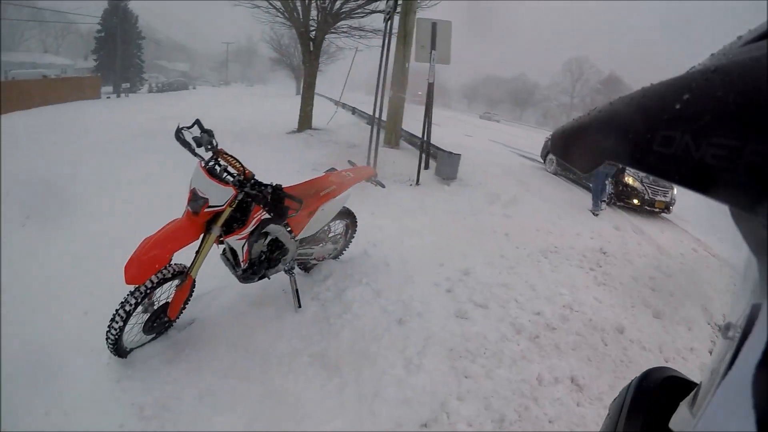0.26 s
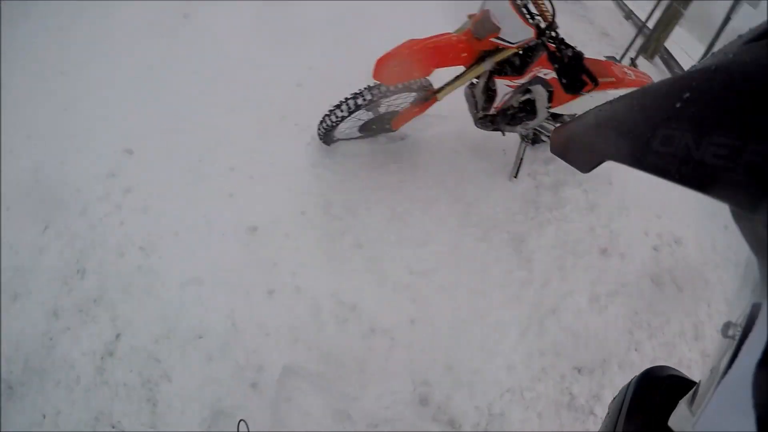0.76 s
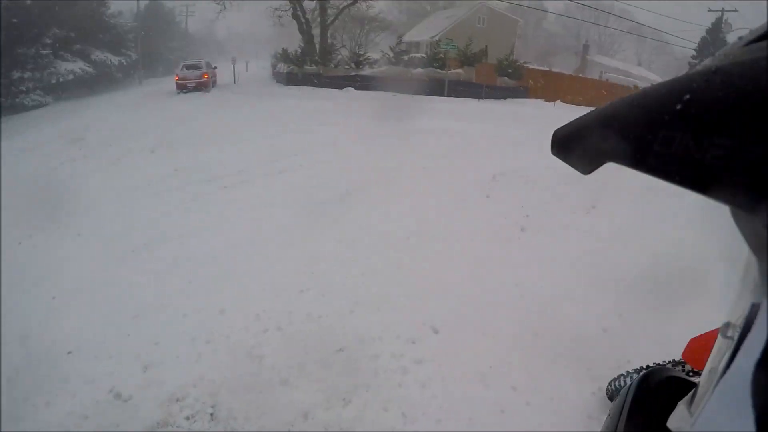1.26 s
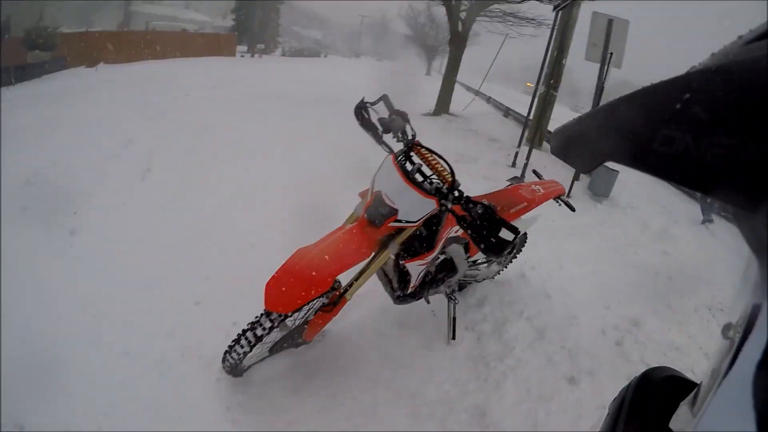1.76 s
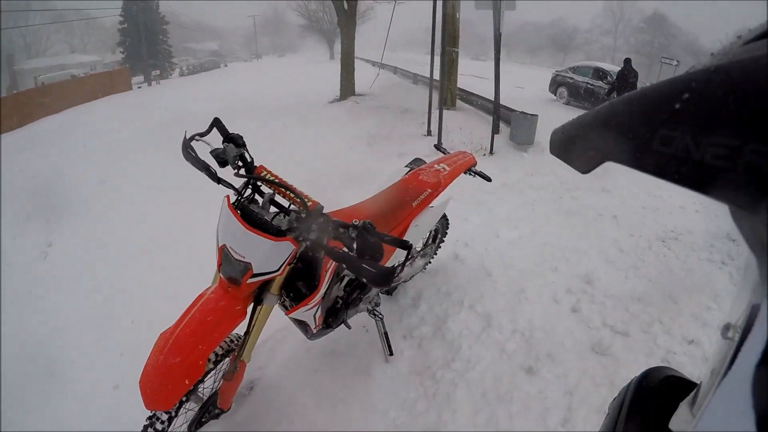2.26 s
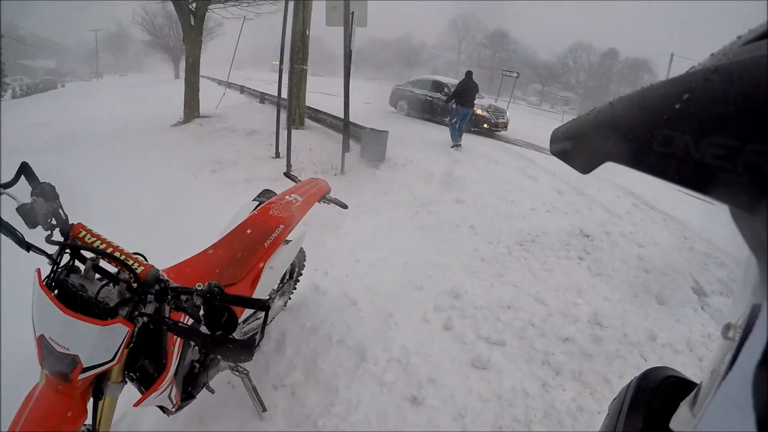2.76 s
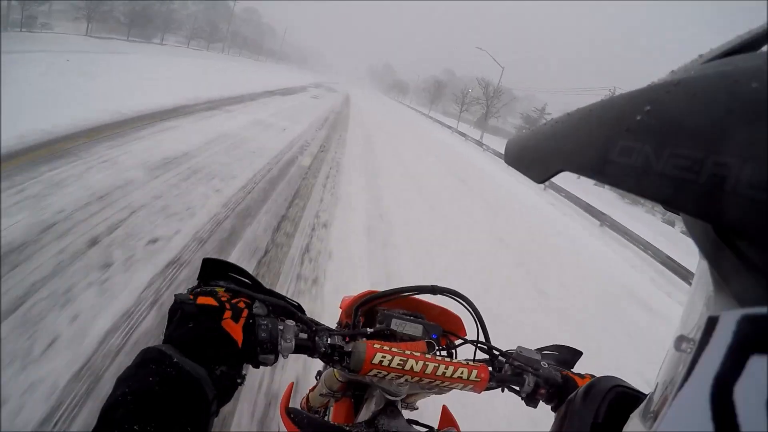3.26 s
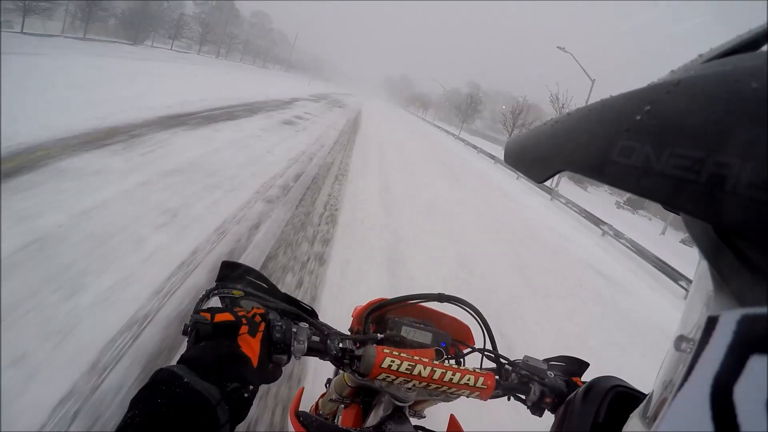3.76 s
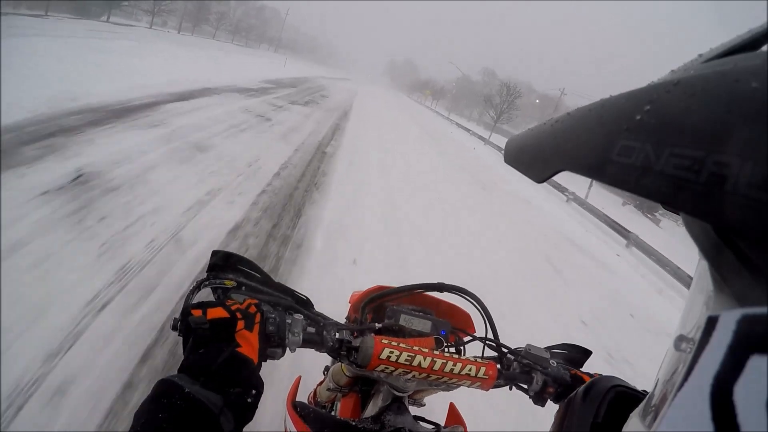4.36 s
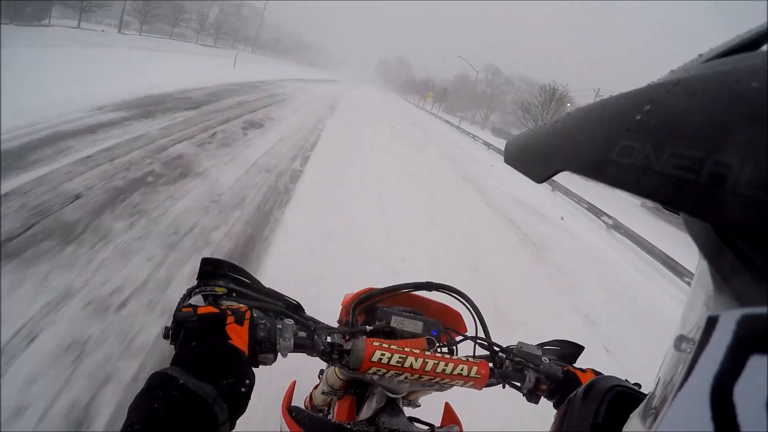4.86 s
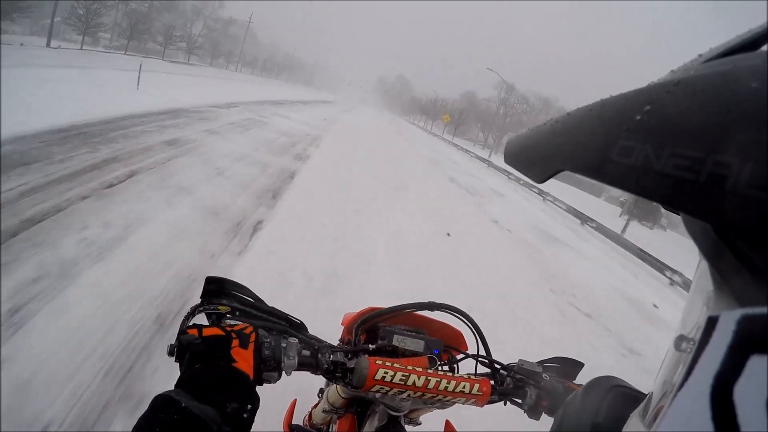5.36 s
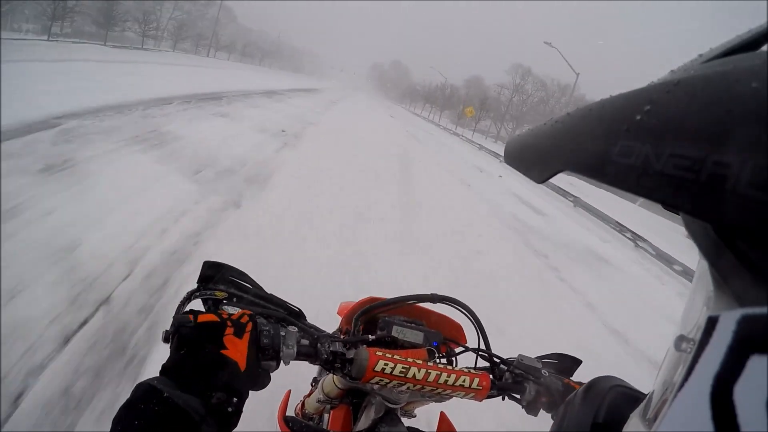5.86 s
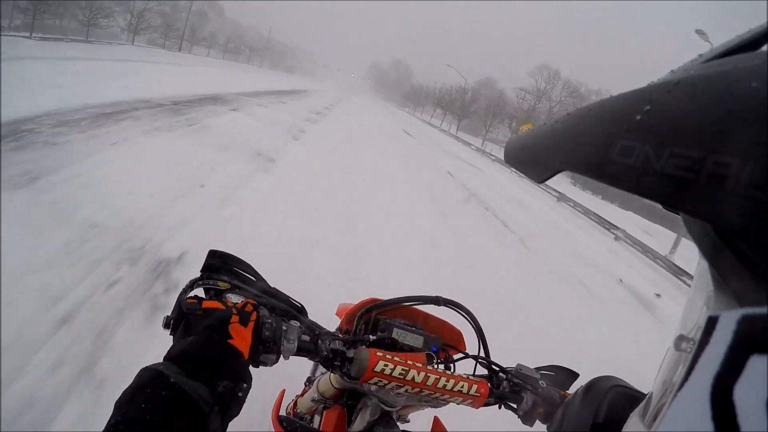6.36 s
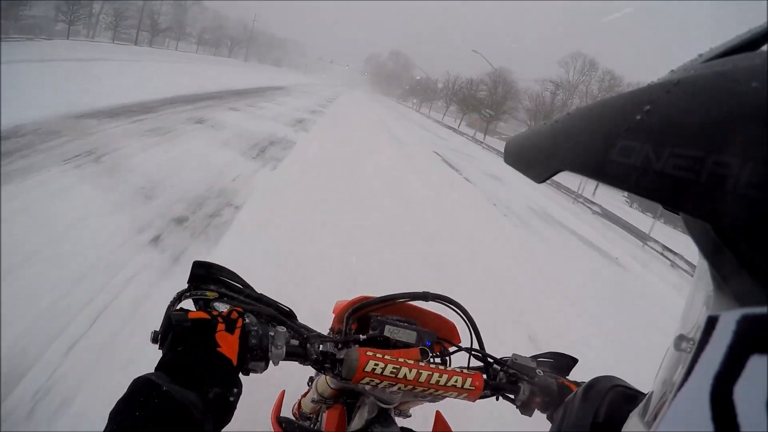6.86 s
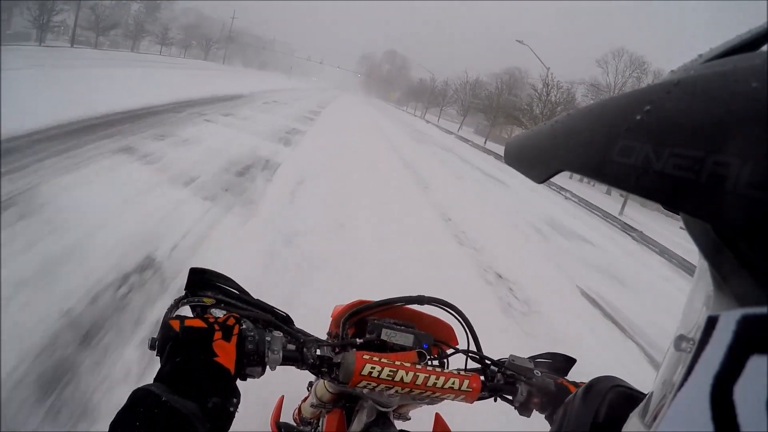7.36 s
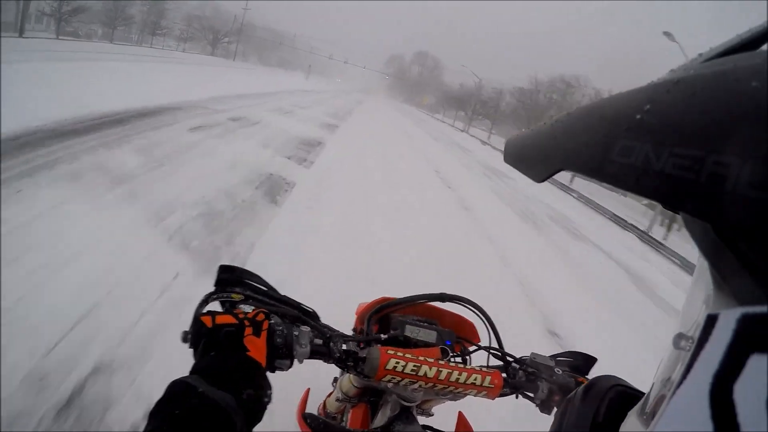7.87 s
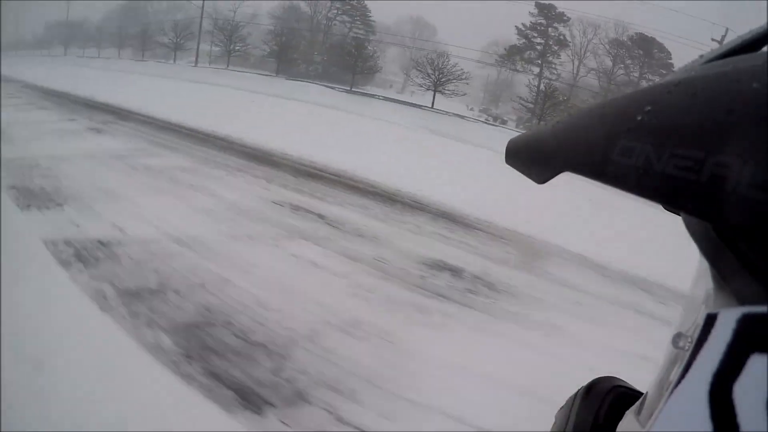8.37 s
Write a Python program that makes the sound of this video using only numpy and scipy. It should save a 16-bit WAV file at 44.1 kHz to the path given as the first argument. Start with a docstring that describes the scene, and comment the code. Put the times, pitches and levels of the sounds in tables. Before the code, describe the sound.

Gusty snowstorm buffeting with sparse sleet taps jumps to a dense riding crackle and steady airstream, ending in fuller wind and engine hum.

```python
"""A snowstorm outdoors, heard at a helmet microphone: first beside a parked dirt bike, then riding a snowy road.
Filtered noise makes the wind: a deep throb, buffeting and a fluttering rush, in gusts and then a steady airstream.
Random short bursts make icy grains and soft flakes hitting the housing; ringing tones make wet clumps knock on it.
At speed the hits merge into a loud crackle over a faint engine built from sine waves.
Near the end the head turns out of the snow: the hits fade while the wind and engine grow."""
import sys
import numpy as np
from scipy import signal
from scipy.fft import rfft, irfft, next_fast_len
from scipy.io import wavfile
from scipy.ndimage import uniform_filter1d

SR = 44100
rng = np.random.default_rng(int(sys.argv[2]) if len(sys.argv) > 2 else 0)


def generate_wav(sig):
    """Save sig (samples, or channels by samples) to the path in sys.argv[1] as 16-bit PCM at SR."""
    pcm = np.round(np.clip(np.atleast_2d(sig).T, -1, 1) * 32767).astype(np.int16)
    wavfile.write(sys.argv[1], SR, pcm)


N = 380141
TIME = np.arange(N) / SR  # seconds

CUT_S = 3.188  # the standing scene stops here and the riding scene starts
TURN_S, TURN_TAKES_S = 7.98, 0.12  # when the head starts to turn aside, and how long it takes

# Light wind between the gusts, in dB.
CALM_THROB_DB, CALM_BUFFET_DB = -34, -53
SURGE_RISE_S = 0.044
BUFFET_LINGER = 1.3  # buffeting dies this many times more slowly than the rush
SLEET_LULL_DB = -68  # sleet between showers, before the lift given to all sleet
THROB_SWAY_DB, THROB_SWAY_HZ = 3, 6.4  # random sway of the throb at speed: depth and rate
# Airstream level looking ahead, then how much airstream and buffeting rise with the turn.
AIR_DB, AIR_TURN_DB, BUFFET_TURN_DB = -36.5, 4.5, 7
# Icy grains in average snowfall, before the crackle lift; dB gained for each dB of flakes.
ICE_DB, ICE_FOLLOWS = -46.5, 0.55
CRACKLE_LIFT_DB = 8.5
PELLET_LIFT_DB = 8.5
ENGINE_DB, ENGINE_TURN_DB = -44.5, 3  # engine level looking ahead, and its rise with the turn
EDGE_HZ = 15650  # top of the sound band

# Gusts straight into the port. Each row: start in seconds, rise in seconds, hold in seconds,
# time to fade by 20 dB in seconds, rush level in dB, buffeting level in dB.
GUSTS = [(0.947, 0.032, 0.2, 0.023, -39, -28), (1.531, 0.097, 0.014, 0.065, -36.5, -27),
         (1.675, 0.017, 0.055, 0.28, -40, -36), (1.996, 0.03, 0.057, 0.089, -62, -42.5),
         (2.316, 0.043, 0.038, 0.04, -58, -42.5), (2.563, 0.14, 0.022, 0.016, -39.5, -34),
         (2.732, 0.04, 0.17, 0.5, -54.5, -41)]
# Large slow eddies that pump the port while standing. Each row: start in seconds, level in dB,
# hold in seconds, time to fade by 20 dB in seconds.
SURGES = [(0.01, -24.5, 0.017, 0.42), (0.578, -13, 0.086, 0.3), (0.96, -15.5, 0.016, 0.35),
          (1.313, -24, 0.02, 0.072), (1.518, -20, 0.018, 0.18), (1.68, -23.5, 0.018, 0.17),
          (1.89, -22.5, 0.011, 0.17), (2.886, -23, 0.017, 0.6)]
# Sleet blown at the standing helmet. Each row: start in seconds, rise in seconds, hold in seconds,
# time to fade by 20 dB in seconds, level in dB before the lift given to all sleet.
SLEET_SHOWERS = [(0.011, 0.026, 0.1, 0.049, -56.5), (0.208, 0.048, 0.64, 0.096, -46),
                 (0.93, 0.025, 0.034, 0.098, -45), (1.494, 0.88, 0.83, 0.3, -55.5)]
# Single large ice grains. Each row: time in seconds, level in dB before the pellet lift,
# pitch in Hz (it sets how bright the snap is).
PELLETS = [(0.0558, -18.5, 2440), (0.0922, -19.5, 2040), (0.1141, -17, 2230), (0.2389, -17, 2040),
           (0.3321, -15.5, 1940), (0.5392, -19.5, 1820), (0.6165, -42, 1180), (0.7667, -17, 2170),
           (1.7754, -30, 1280), (1.8846, -28, 1540), (1.952, -27, 1550), (2.586, -24.5, 1690),
           (2.6214, -23.5, 2020), (2.7322, -22, 2080), (2.814, -25, 2090), (2.9193, -25, 1800),
           (3.25, -4.5, 1455), (3.497, -7.5, 1770), (3.7618, -10, 1800), (3.9544, -12.5, 2440),
           (4.13, -4.5, 1470), (4.365, -11.5, 1790), (4.459, -10, 2470), (5.505, -13.5, 1510),
           (5.9873, -9.5, 1800), (6.145, -8, 1530), (6.6468, -7.5, 1530), (6.7263, -11.5, 1970),
           (6.8724, -17, 2300), (7.007, -14, 1740), (7.2448, -11, 1790), (7.296, -12, 1500),
           (7.6514, -6, 1480), (7.7206, -14, 1900), (8.0651, -9, 2340)]
# Wet clumps knocking on the housing. Each row: time in seconds, knock level in dB, pitch in Hz,
# thump level in dB.
KNOCKS = [(0.9746, -11, 1560, -36), (1.289, -32, 1400, -55), (1.5316, -10.5, 1564, -16.5),
          (8.1403, -6.5, 1460, -28), (8.2898, -16, 1530, -41), (8.5009, -15, 1560, -20)]
# Tones in a knock. Each row: multiple of the knock's pitch, relative level in dB.
KNOCK_TONES = [(.58, -10), (1, 0), (1.72, -16)]
# Tones of a thump in the port. Each row: frequency in Hz, relative level in dB, time to fall 60 dB in seconds.
THUMP_TONES = [(45, 6, 0.39), (124, -0.5, 0.075), (235, -0.5, 0.083), (2630, 1, 0.015), (5160, -20, 0.013)]
# Deep throb while riding, before its random sway. Each row: time in seconds, level in dB.
RIDE_THROB = [(3.2, -18), (3.75, -19), (4.2, -16), (4.7, -20), (5.4, -16.5), (5.9, -22.5), (6.45, -19),
              (7.3, -19.5), (7.86, -19.5), (8.0, -30.5), (8.12, -19.5), (8.62, -16)]
# Buffeting at the port while riding, before the rise with the turn. Each row: time in seconds, level in dB.
RIDE_BUFFET = [(3.2, -28), (3.6, -26.5), (4.15, -28), (4.4, -24), (5.6, -30), (6.7, -32), (6.85, -28),
               (7.1, -32.5), (8.0, -31)]
# Soft flakes hitting while riding. Each row: time in seconds, level in dB before a 0.3 dB lift.
FLAKES = [(3.2, -25), (4.25, -27), (4.9, -32), (5.25, -24.5), (5.55, -30), (5.9, -29), (6.9, -33),
          (7.2, -33), (7.45, -26), (7.9, -25.5), (8.12, -30)]
# Flurries of icy grains on the road. Each row: middle in seconds, length in seconds,
# level in dB before the crackle lift.
FLURRIES = [(3.253, 0.058, -38.5), (3.518, 0.077, -36.5), (4.484, 0.15, -40.5), (4.92, 0.099, -48.5),
            (5.773, 0.23, -40), (6.082, 0.28, -42.5), (6.746, 0.023, -30.5), (6.872, 0.06, -40.5),
            (7.137, 0.09, -37), (7.232, 0.052, -42), (7.74, 0.26, -41)]
# Engine speed. Each row: time in seconds, shaft turns per second before a small random waver.
SHAFT = [(3.2, 62.4), (5.0, 60.8), (6.0, 59.5), (7.2, 58), (7.7, 58.6), (8.2, 60), (8.62, 59)]
# Engine tones. Each row: multiple of the shaft speed, relative level in dB looking ahead,
# relative level in dB looking aside.
ENGINE_ORDERS = [(7, -3, 2), (8, -11, -9), (10, -2, -16), (10.5, -14, -7), (12.5, -12, -7), (16, -6, -10),
                 (22, -6, -12)]
# Resonances of the housing. Each row: frequency in Hz, width in Hz, lift in dB (negative for a dip).
HOUSING = [(241.6, 33, 3), (660, 36, -1.5), (948, 80, 1.5), (1493, 190, 3.5), (2394, 660, 5.5),
           (3715, 890, 5.5), (5236, 670, 7.5), (6750, 420, 3.5), (9970, 760, 3), (11350, 1500, 4)]

# Colours of the sounds before the housing. Each row: frequency in Hz, relative level in dB per Hz.
# Deep throb of the wind.
THROB_COLOUR = [(12, -44), (23, -7.5), (31, -3), (39, -3), (47, -4), (61, -23), (86, -42), (210, -66),
                (520, -99)]
# Quick eddies while the port faces the airstream.
BUFFET_COLOUR = [(40, -22), (66, -2), (92, 1), (150, -4), (200, -8.5), (270, -11), (360, -19), (640, -33),
                 (1600, -55), (5200, -90)]
# Slow eddies around the standing or turned helmet.
BREEZE_COLOUR = [(45, -19), (80, 7), (115, 1.5), (155, 2), (205, -8), (262, -12), (345, -29), (600, -54),
                 (1600, -71)]
# Rush of the gusts.
GUST_COLOUR = [(110, -23), (240, 0), (410, -8), (590, 2), (880, -6), (1300, 0), (1720, -3), (2180, -17.5),
               (2720, -13.5), (3150, -30.5), (6100, -39), (14500, -56)]
# Rush of the airstream at speed.
AIR_COLOUR = [(110, -5), (310, -2.5), (760, -6.5), (1320, -0.5), (1780, -7), (2620, -14), (3180, -19.5),
              (4450, -21.5), (5280, -19.5), (6050, -27.5), (9100, -31.5), (14500, -53)]
# Ice grains hitting while standing, and the large pellets.
ICE_COLOUR = [(110, 1), (420, -13), (980, -7.5), (2050, -3), (2950, -10), (4900, -10), (6900, -11.5),
              (9800, -15.5), (13200, -23), (16200, -19)]
# Hiss of drifting snow.
DRIFT_COLOUR = [(110, 11), (480, 5.5), (980, 1.5), (1900, -2.5), (3150, -13), (6100, -23), (14500, -20)]
# Soft flakes hitting at speed.
FLAKE_COLOUR = [(115, -10), (295, -6), (700, -2), (1150, -1.5), (1560, 0), (2020, -1.5), (2580, -6.5),
                (3250, -13), (4450, -17.5), (7200, -26), (14400, -43)]
# Ice grains hitting at speed.
CRACKLE_COLOUR = [(100, -9), (500, -11.5), (1000, -9), (2000, -7.5), (3200, -2), (5000, -9), (7000, -6),
                  (10500, -14.5), (13000, -19), (16000, -18)]


def gain_of(db):
    """Turns decibels into a gain."""
    return 10 ** (np.asarray(db) / 20)


def follow(rows):
    """Turns a level curve in dB into a gain for every sample."""
    return gain_of(np.interp(TIME, *np.transpose(rows)))


def add(mix, s, sound):
    """Lays a sound into the mix at a time in seconds."""
    part = mix[max(round(s * SR), 0):][:len(sound)]
    part += sound[:len(part)]


def evened(x):
    """Scales to an average (rms) strength of 1."""
    return x / np.sqrt(np.mean(x ** 2) + 1e-20)


def together(gains):
    """Combined strength of independent noises: their powers add."""
    return np.sqrt(sum(g ** 2 for g in gains))


def swell(start, rise, hold, fade):
    """Rises to one, holds, then loses 20 dB in every fade time, down to 200 dB."""
    t = TIME - start
    fall_db = -20 * np.clip((t - rise - hold) / fade, 0, 10)
    return np.clip(t / rise, 0, 1) * gain_of(fall_db)


def wander(hz):
    """Random drift of rms 1, with little movement faster than the given rate."""
    step = 32  # the drift is slow, so make one point per 32 samples and join them up
    size = next_fast_len(N // step + 2)
    smooth = np.exp(-(np.fft.rfftfreq(size, step / SR) / hz) ** 2)
    drift = irfft(rfft(rng.standard_normal(size)) * smooth, size)
    return evened(np.interp(TIME, np.arange(size) * step / SR, drift))


def housing(colour, size=4096):
    """Response to one click, with a given colour shaped by the resonances of the housing."""
    hz = np.fft.rfftfreq(size, 1 / SR)
    colour_hz, colour_db = np.transpose(colour)
    db = np.interp(np.log(hz + 1), np.log(colour_hz), colour_db)
    for at, width, lift in HOUSING:
        db = db + lift / (1 + (2 * (hz - at) / width) ** 2)
    # choose phases so that the response starts at once and never before the click
    log_gain = np.log(gain_of(np.r_[db, db[-2:0:-1]]))
    return np.fft.ifft(np.exp(np.conj(signal.hilbert(log_gain)))).real


def coloured(x, colour, size=4096):
    """Passes a raw sound through the housing and scales it to rms 1."""
    return evened(signal.oaconvolve(x, housing(colour, size=size))[:N])


def eddies(colour, steadiness):
    """Low turbulence from coloured noise, whose random lulls are partly filled in."""
    noise = coloured(rng.standard_normal(N), colour, size=16384)
    swirl = signal.hilbert(noise, next_fast_len(N))[:N]
    strength = np.sqrt(uniform_filter1d(abs(swirl) ** 2, size=1500) + 1e-3)
    return evened(swirl.real / strength ** np.clip(steadiness, 0, 1))


def shatter(decay_s, slope_db, size=512):
    """One grain breaking: a brief dying burst of noise, tilted in dB per octave above 1400 Hz."""
    burst = rng.standard_normal(size) * np.exp(-np.arange(size) / SR / decay_s)
    octaves = np.log2(np.maximum(np.fft.rfftfreq(2 * size, 1 / SR), 1400) / 4200)
    padded = np.r_[np.zeros(24), burst]  # room for the tilt to spread the start
    burst = irfft(rfft(padded, 2 * size) * gain_of(slope_db * octaves))[:size]
    return burst / np.linalg.norm(burst)


def hail(rate, sizes_db, decay_s, slopes_db, ceiling, count=24):
    """Random impacts per second, mostly small, few large; each spot on the housing has its own tilt."""
    at = np.flatnonzero(rng.random(N) < rate / SR)
    size = gain_of(sizes_db * np.minimum(rng.exponential(1, N), ceiling))[at]
    spot = rng.integers(0, count, N)[at]
    shapes = [shatter(decay_s, slope) for slope in slopes_db * np.linspace(-1, 1, count)]
    out = np.zeros(N)
    for i, strength, k in zip(at, size, spot):
        add(out, i / SR, strength * shapes[k])
    return out


def turned():
    """How far the head has turned aside, from 0 to 1."""
    return np.clip((TIME - TURN_S) / TURN_TAKES_S, 0, 1)


def wind_standing():
    """Strength of throb, buffeting and rush: surges and gusts over a light wind."""
    throbs = [gain_of(CALM_THROB_DB)]
    for start, db, hold, fade in SURGES:
        throbs.append(gain_of(db) * swell(start, SURGE_RISE_S, hold, fade))
    buffets, rushes = [gain_of(CALM_BUFFET_DB)], []
    for start, rise, hold, fade, rush_db, buffet_db in GUSTS:
        buffets.append(gain_of(buffet_db) * swell(start, rise, hold, fade * BUFFET_LINGER))
        rushes.append(gain_of(rush_db) * swell(start, rise, hold, fade))
    return together(throbs), together(buffets), together(rushes)


def wind_riding():
    """Strength of throb, buffeting and rush at speed; the last two grow as the head turns."""
    turn = turned()
    throb = follow(RIDE_THROB) * gain_of(THROB_SWAY_DB * wander(hz=THROB_SWAY_HZ))
    buffet = follow(RIDE_BUFFET) * gain_of(BUFFET_TURN_DB * turn)
    return throb, buffet, gain_of(AIR_DB + AIR_TURN_DB * turn)


def wind():
    """Eddies throb and buffet at the port; gusts and the airstream add a fluttering rush."""
    riding = TIME > CUT_S
    throbbing, buffeting, rushing = np.where(riding, wind_riding(), wind_standing())
    throb = throbbing * eddies(THROB_COLOUR, steadiness=0.84) * gain_of(0.03)

    head_on = riding * (1 - turned())  # eddies are quick only with the port facing the airstream
    quick = np.sqrt(head_on) * eddies(BUFFET_COLOUR, steadiness=0.16)
    slow = np.sqrt(1 - head_on) * eddies(BREEZE_COLOUR, steadiness=0.2)
    lumps = gain_of(1.5 * wander(hz=15) - 0.57)  # eddies arrive in lumps
    buffet = buffeting * (quick + slow) * lumps

    flutter = wander(hz=83)
    puffs = coloured(gain_of(2.8 * flutter) * rng.standard_normal(N), GUST_COLOUR)
    stream = coloured(gain_of(2.0 * flutter) * rng.standard_normal(N), AIR_COLOUR)
    return throb + buffet + rushing * np.where(riding, stream, puffs)


def snow_standing():
    """Separate icy ticks come in showers over the faint hiss of drifting snow."""
    ticks = hail(rate=1300, sizes_db=7.5, decay_s=0.00081, slopes_db=0.5, ceiling=2.56)
    showers = [gain_of(SLEET_LULL_DB)]
    for *shape, db in SLEET_SHOWERS:
        showers.append(gain_of(db) * swell(*shape))
    lift = gain_of(3.0 + 2.2 * wander(hz=7.9))  # 3 dB on all sleet, with random swings
    sleet = lift * coloured(ticks, ICE_COLOUR) * together(showers)
    drift = gain_of(-59.5) * coloured(rng.standard_normal(N), DRIFT_COLOUR)
    return (sleet + drift) * (TIME < CUT_S)


def pellets():
    """The largest ice grains snap against the housing; higher-pitched ones are brighter all through."""
    out, shell = np.zeros(N), housing(ICE_COLOUR)
    thin = signal.butter(1, 1100, "high", fs=SR)  # a hard, light grain gives little bass
    for s, db, hz in PELLETS:
        grain = shatter(decay_s=0.0019, slope_db=7.0 * np.log2(hz / 2300))
        snap = signal.lfilter(*thin, signal.fftconvolve(grain, shell))
        add(out, s, gain_of(db + PELLET_LIFT_DB) * snap / np.linalg.norm(snap))
    return out


def knocks():
    """A wet clump rings the housing for a few cycles and pushes a low thump into the port."""
    out, t = np.zeros(N), np.arange(SR // 8) / SR
    contact = t / 0.0013  # the blow is strongest after 1.3 ms
    blow = contact ** 2 * np.exp(2 * (1 - contact))
    thump = sum(np.sin(2 * np.pi * hz * t) * gain_of(db - 60 * t / t60) for hz, db, t60 in THUMP_TONES)
    for s, db, hz, thump_db in KNOCKS:
        ring = sum(gain_of(level) * np.sin(2 * np.pi * ratio * hz * t) for ratio, level in KNOCK_TONES)
        add(out, s, gain_of(db) * blow * ring - gain_of(thump_db) * thump)
    return out


def snow_riding():
    """Soft flakes merge into a dense patter under crackling icy flurries, until the head turns away."""
    flakes = hail(rate=3300, sizes_db=2.0, decay_s=0.0009, slopes_db=2.5, ceiling=5.1)
    flakes *= gain_of(0.92 * wander(hz=42))
    ice = hail(rate=1150, sizes_db=5.5, decay_s=0.00082, slopes_db=0.0, ceiling=4.7)
    ice *= gain_of(2.8 * wander(hz=51.0))

    snowfall = follow(FLAKES)
    icy = [gain_of(ICE_DB) * evened(snowfall) ** ICE_FOLLOWS]
    for middle, length, db in FLURRIES:
        icy.append(gain_of(db) * np.exp(-(2 * (TIME - middle) / length) ** 2))
    patter = gain_of(0.3) * coloured(flakes, FLAKE_COLOUR) * snowfall
    crackle = gain_of(CRACKLE_LIFT_DB) * coloured(ice, CRACKLE_COLOUR) * together(icy)

    in_the_snow = np.clip((8.15 - TIME) / 0.14, 0, 1)  # silent from 8.15 s, after a 0.14 s fade
    return (patter + crackle) * in_the_snow * (TIME > CUT_S)


def engine():
    """Sine waves at multiples of the shaft speed waver; turning the head brings the low one forward."""
    speed = np.interp(TIME, *np.transpose(SHAFT)) * (1 + .008 * wander(hz=20))
    turns, aside = np.cumsum(speed) / SR, turned()
    hum = np.zeros(N)
    for order, ahead_db, aside_db in ENGINE_ORDERS:
        level_db = (1 - aside) * ahead_db + aside * aside_db + 2.5 * wander(hz=4.4)
        hum += gain_of(level_db) * np.sin(2 * np.pi * order * turns)
    return gain_of(ENGINE_DB + ENGINE_TURN_DB * aside) * hum * (TIME > CUT_S)


def scene():
    """Everything reaches one microphone, with no echo in the open snow."""
    return (wind() + snow_standing() + pellets() + knocks() + snow_riding() + engine())[None]


def record(dry):
    """Removes the treble above the top of the sound band."""
    low_pass = signal.firwin(255, EDGE_HZ, window=("kaiser", 9), fs=SR)
    return signal.oaconvolve(dry, low_pass[None], "same")


dry = scene()
out = record(dry)
generate_wav(out)
```